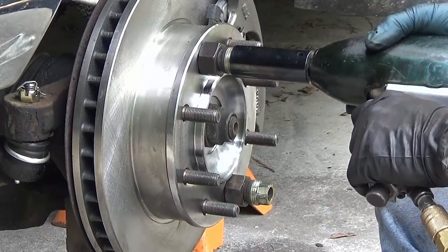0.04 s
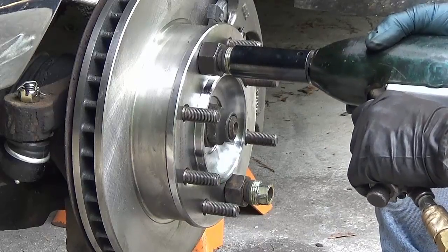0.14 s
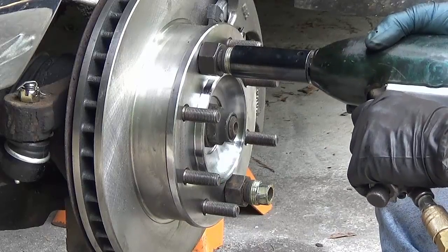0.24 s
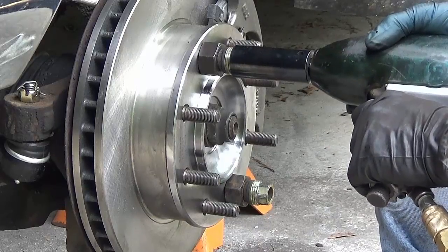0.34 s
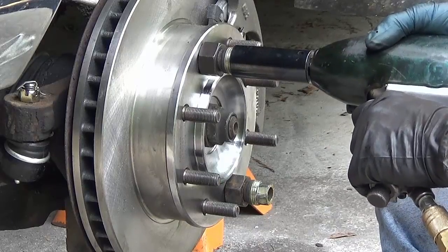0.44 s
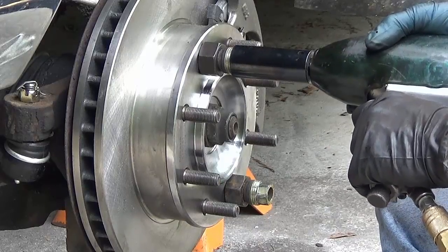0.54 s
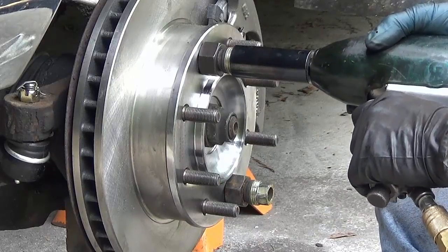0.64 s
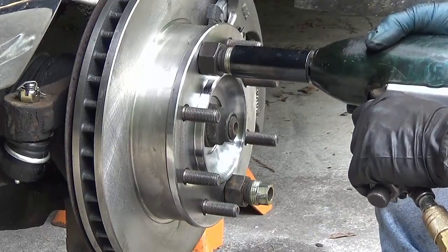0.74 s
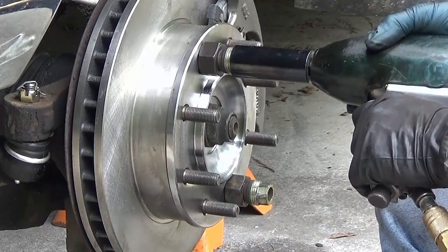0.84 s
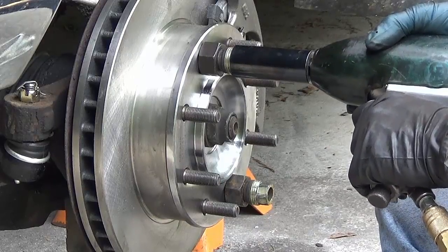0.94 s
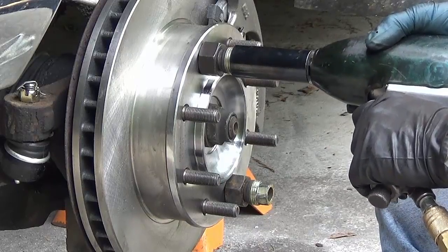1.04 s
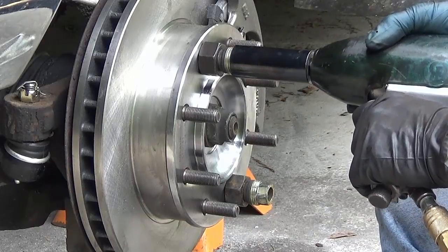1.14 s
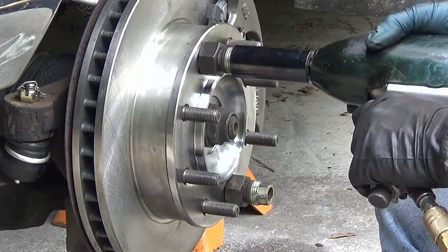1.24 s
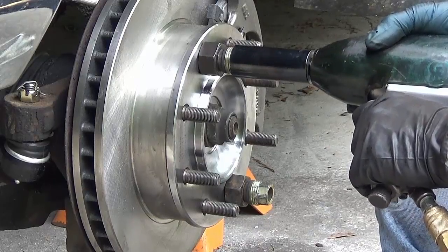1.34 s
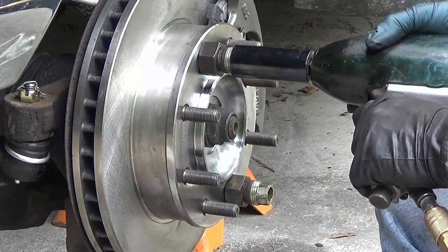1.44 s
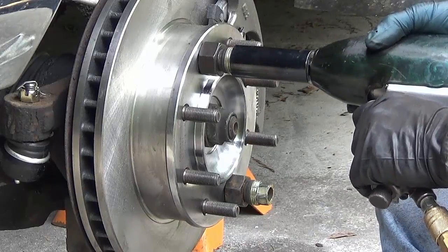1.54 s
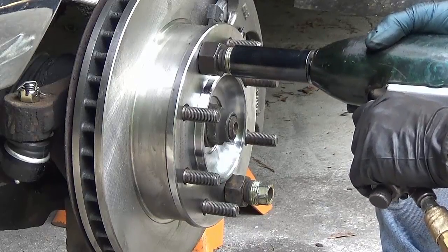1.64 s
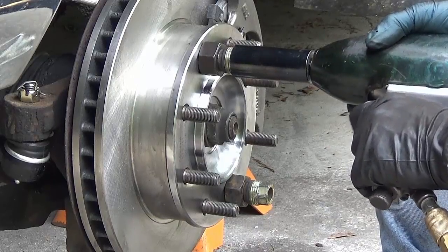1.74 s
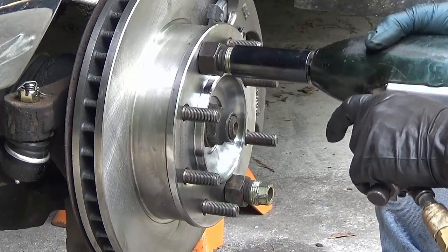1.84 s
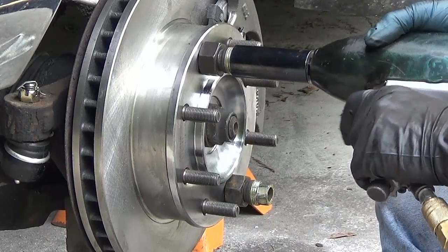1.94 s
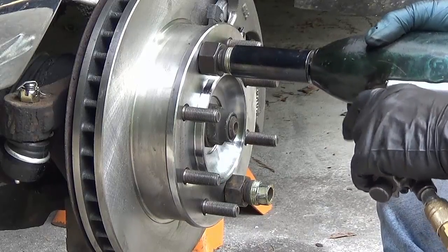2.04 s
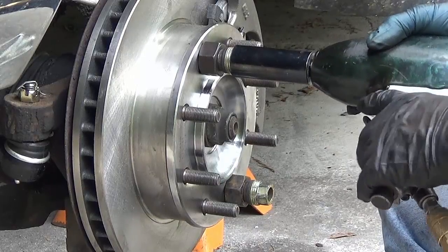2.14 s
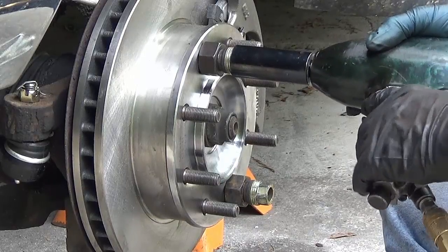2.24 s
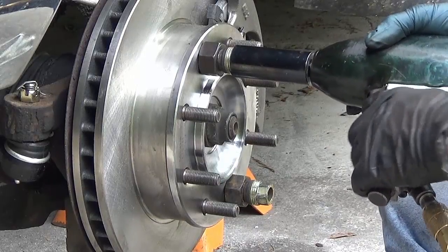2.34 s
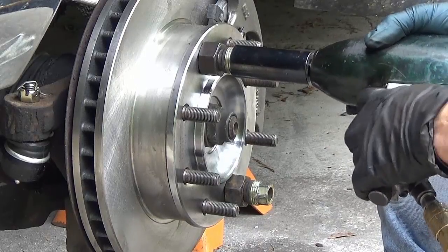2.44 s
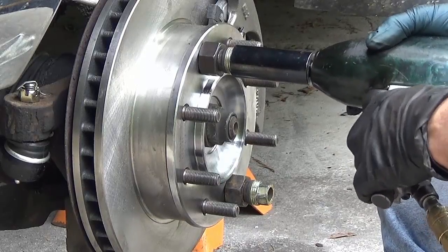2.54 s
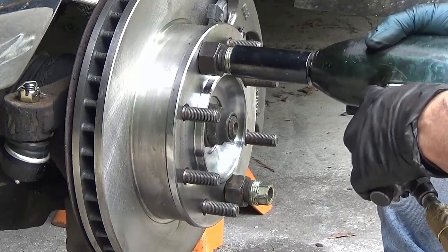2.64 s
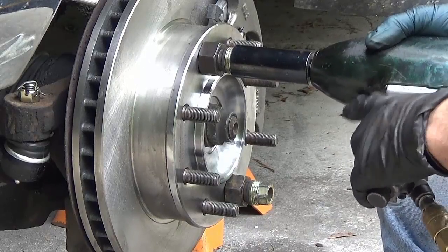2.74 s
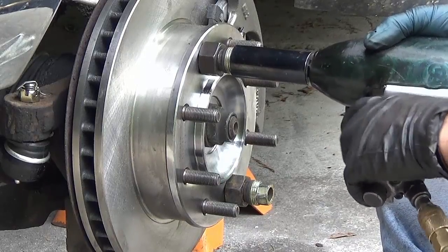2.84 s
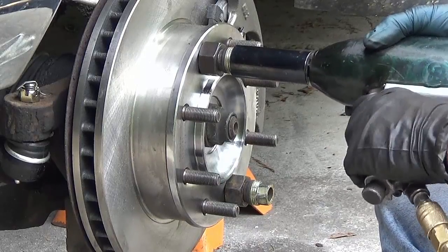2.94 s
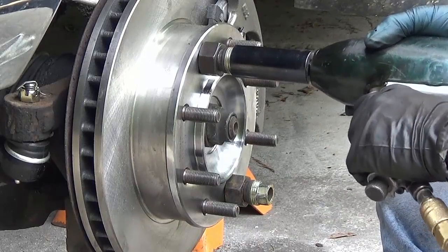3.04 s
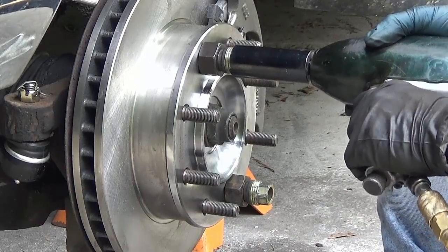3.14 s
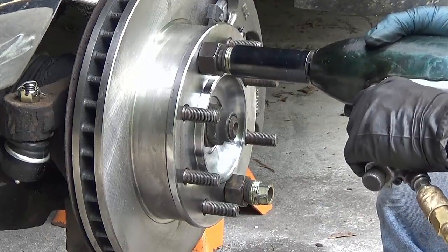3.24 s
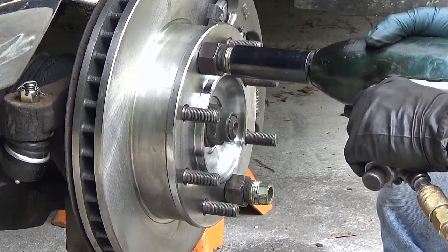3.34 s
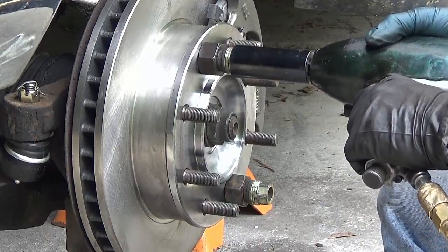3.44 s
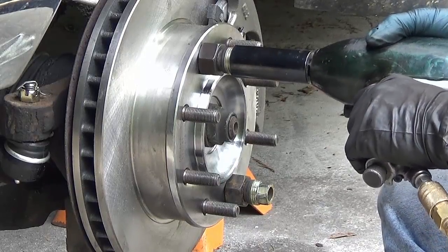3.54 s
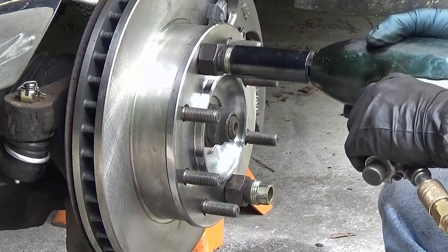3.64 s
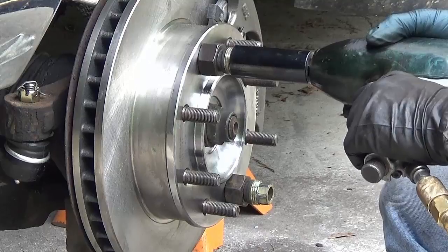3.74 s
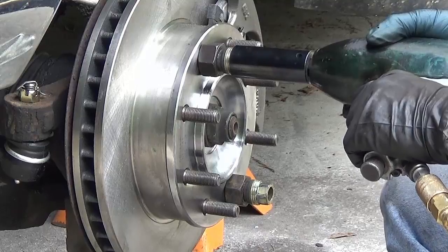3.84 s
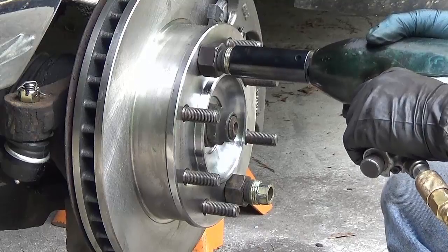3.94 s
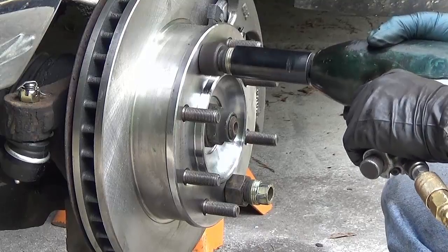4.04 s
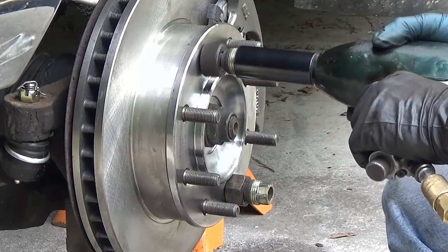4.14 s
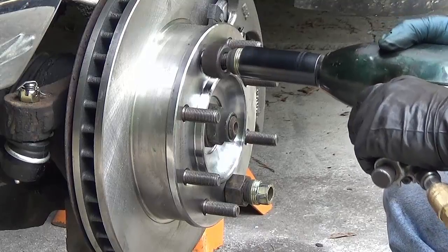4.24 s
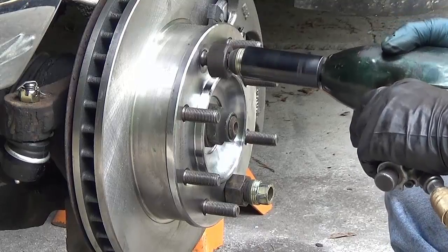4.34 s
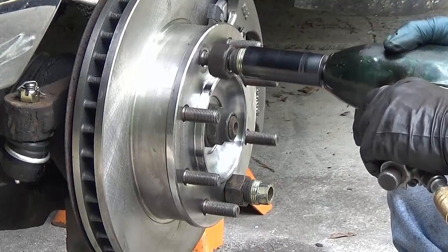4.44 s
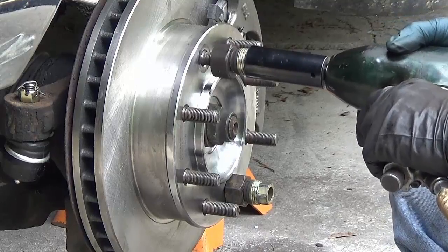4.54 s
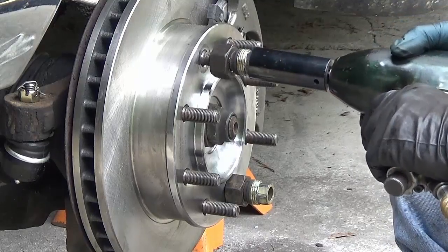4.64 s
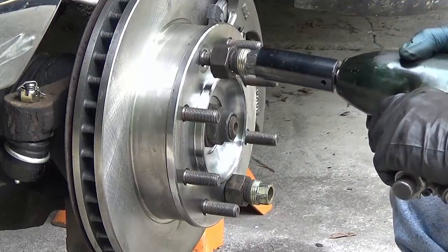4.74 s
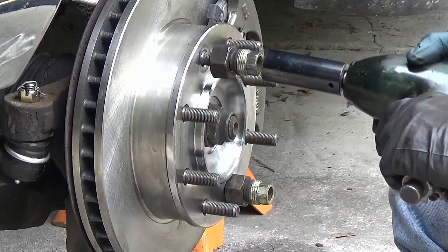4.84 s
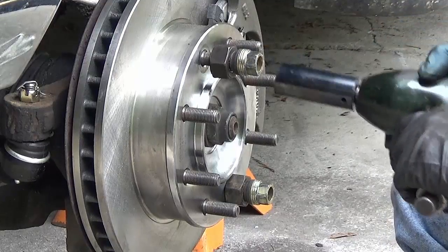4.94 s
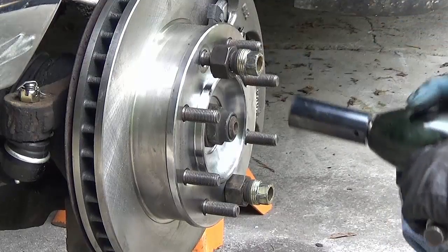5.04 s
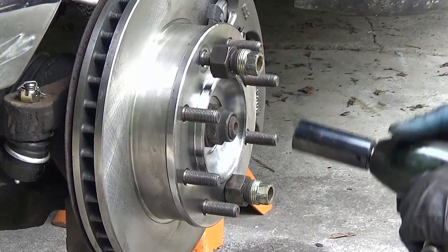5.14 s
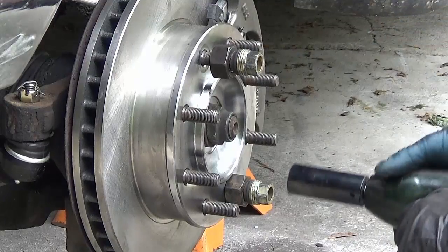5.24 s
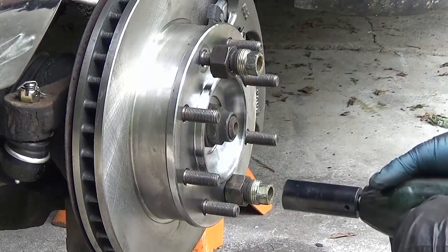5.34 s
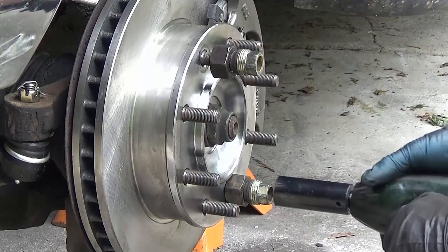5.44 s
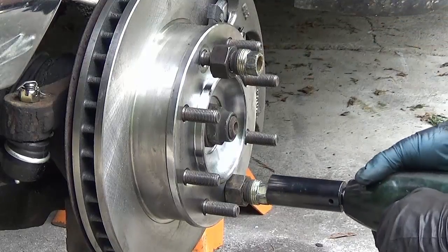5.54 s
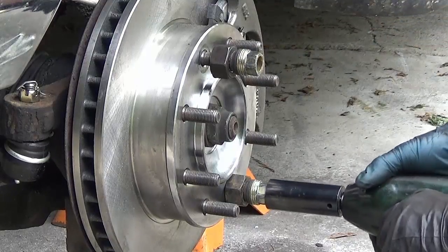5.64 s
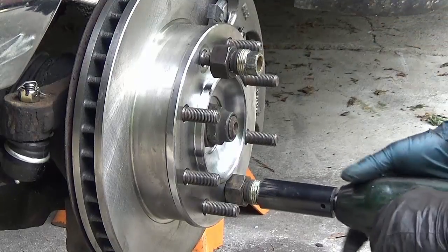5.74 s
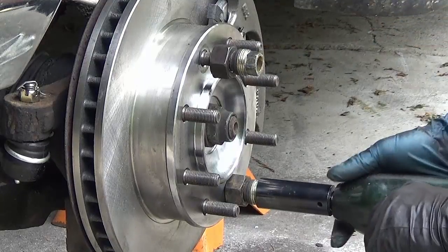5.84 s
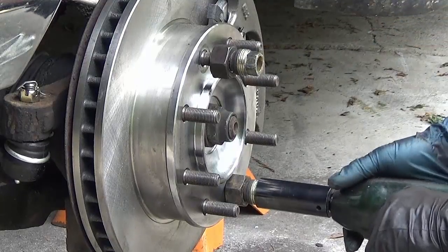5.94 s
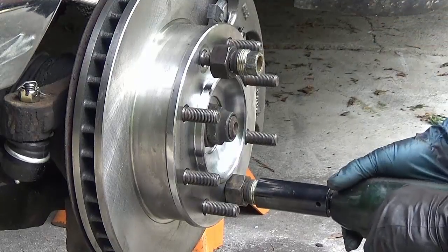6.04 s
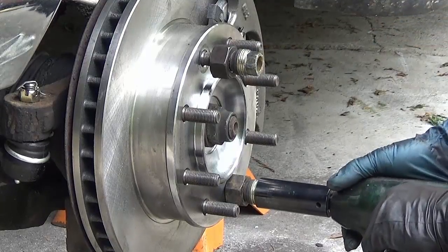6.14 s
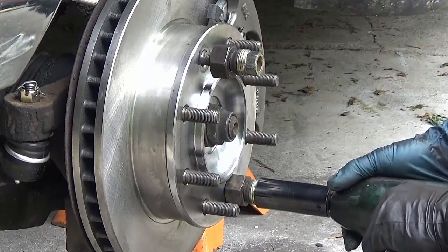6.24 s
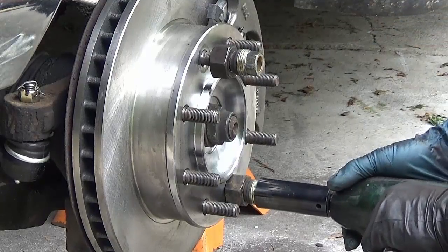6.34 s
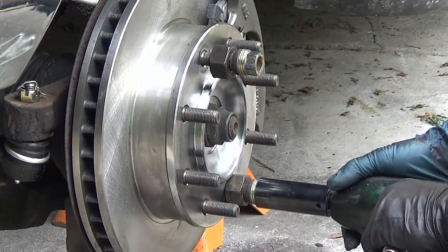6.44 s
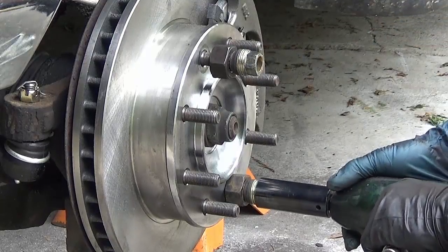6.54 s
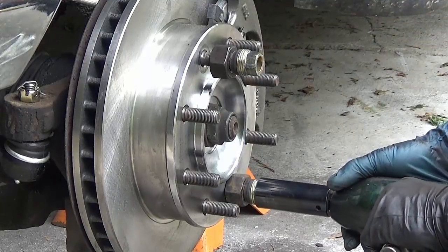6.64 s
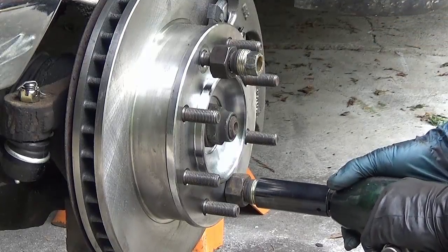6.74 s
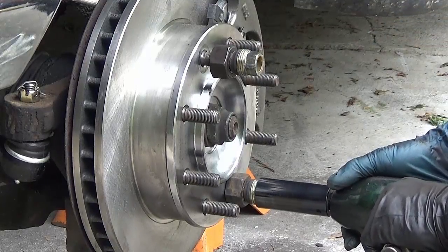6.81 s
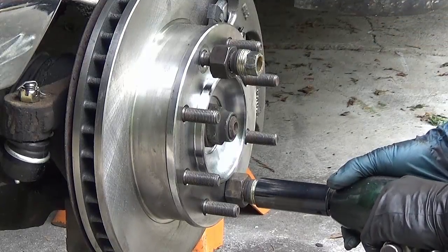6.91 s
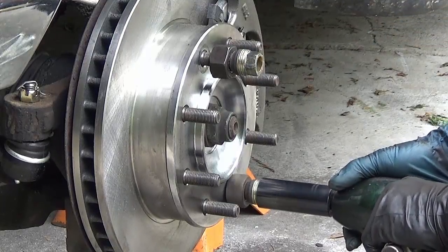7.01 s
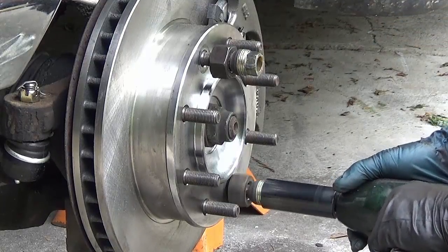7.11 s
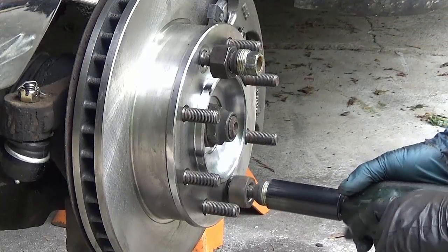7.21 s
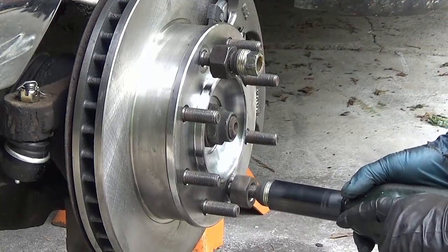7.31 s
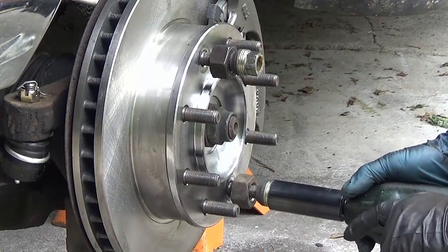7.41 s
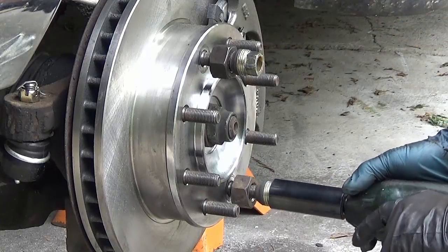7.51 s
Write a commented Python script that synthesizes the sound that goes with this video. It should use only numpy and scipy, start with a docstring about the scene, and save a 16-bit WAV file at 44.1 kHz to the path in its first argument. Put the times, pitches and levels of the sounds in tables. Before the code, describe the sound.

Three bursts of rapid metallic hammering from an air-powered wrench, close and centred in a garage. Each blow cracks and rings steel, with lighter rebounds between, over rough puffing and a broad air hiss. The first burst simply dies away; the next two quicken into a short whine and ticking run-down. Socket clinks and faint glove rustle fill the second gap. Short echoes spread to the sides over a quiet low rumble.

```python
"""An air impact wrench is already hammering, close by in a garage; two more bursts on wheel nuts follow.
Vane puffs and hissing exhaust air carry the motor, which stalls at each blow and whines when the load lets go.
Blows are noise cracks with ringing steel; lighter rebounds, coasting ticks and socket clinks fall between them.
The stereo microphone image has the tool in the middle, echoes at the sides and a low rumble behind.
A limiter ducks the loud moments."""
import sys
import numpy as np
from scipy import signal
from scipy.io import wavfile
from scipy.ndimage import uniform_filter1d, minimum_filter1d

SR = 44100
rng = np.random.default_rng(int(sys.argv[2]) if len(sys.argv) > 2 else 0)


def int16_out(signal):
    """Quantize to a 16-bit WAV file."""
    q = np.round(np.clip(np.atleast_2d(signal).T, -1, 1) * 32767)
    wavfile.write(sys.argv[1], SR, q.astype(np.int16))


N = 333837
T = np.arange(N) / SR


def amp(db):
    """Decibels to gain."""
    return 10 ** (np.asarray(db) / 20)


def unit(x):
    """Scales to rms 1."""
    return x / np.sqrt(np.mean(x ** 2) + 1e-20)


def read(points, hz):
    """A spectrum's value at hz, interpolated on a log frequency axis."""
    f, value = np.transpose(points)
    return np.interp(np.log(hz + 1), np.log(f), value)


def curve(points):
    """A level curve in dB as gain at every sample."""
    return amp(np.interp(T, *np.transpose(points)))


def add(mix, s, sound):
    """Mixes a sound in at time s."""
    part = mix[max(round(s * SR), 0):][:len(sound)]
    part += sound[:len(part)]


def through(x, response):
    """Passes x through an impulse response of energy 1."""
    return signal.oaconvolve(x, response / np.linalg.norm(response))[:N]


def colour(x, spectrum, size=4096):
    """Causal minimum-phase filter with the shape of the given spectrum."""
    log_gain = np.log(amp(read(spectrum, abs(np.fft.fftfreq(size, 1 / SR)))))
    minimum_phase = np.exp(np.conj(signal.hilbert(log_gain)))
    return through(x, np.fft.ifft(minimum_phase).real[:size // 2])


def modes_of(modes, detune=0, size=6000):
    """Impulse response of damped modes; detune shifts each a little by chance."""
    t = T[:size]
    hz, width, db = np.transpose(modes)[:, :, None]
    hz = hz * (1 + detune * rng.standard_normal(hz.shape))
    sign = (-1) ** np.arange(len(hz))[:, None]
    decay = np.exp(-np.pi * width * t)
    response = (sign * amp(db) * np.sqrt(width) * decay * np.sin(2 * np.pi * hz * t)).sum(0)
    return response / np.linalg.norm(response)


def ring(x, modes):
    """Rings a fixed set of modes."""
    return through(x, modes_of(modes))


def wobble(per_s):
    """Smooth chance of rms 1, with per_s new values a second."""
    knots = rng.standard_normal(N // 16)
    return unit(np.interp(T * per_s, np.arange(len(knots)), knots))


# Low rumble of the garage. Each row: frequency in Hz, relative density in dB.
GARAGE_RUMBLE = [(12, -56.5), (20, -28), (86, -4), (172, -8.5), (293, -12.5), (446, -17), (574, -15),
                 (1260, -18.5), (1440, -21), (1570, -17.5), (1910, -22), (3160, -24), (3630, -26),
                 (16000, -70)]
GARAGE_DB = -52.5


def garage():
    """The garage's low rumble, as steady coloured noise."""
    return amp(GARAGE_DB) * colour(rng.standard_normal(N), GARAGE_RUMBLE)


# Air seeping at the valve. Each row: time in seconds, level in dB.
LEAK_LEVEL = [(0, -60), (1.9, -53.5), (2.15, -56.5), (2.4, -53), (2.9, -51.5), (4.3, -53), (4.6, -75),
              (4.9, -67), (5.03, -63), (5.2, -67), (7.57, -53)]
# Spectrum of the seeping air. Each row: frequency in Hz, relative density in dB.
LEAK_SPECTRUM = [(1500, -25.5), (3500, -14.5), (4500, -7.5), (5000, -9.5), (5500, -3.5), (6300, -7.5),
                 (7200, -12), (8600, -15), (9800, -10.5), (12000, -17), (16000, -29.5)]


def leak():
    """Air seeping at the valve makes a thin, faint hiss of turbulence."""
    return curve(LEAK_LEVEL) * colour(rng.standard_normal(N), LEAK_SPECTRUM)


# The tool is carried to the next nut: middle of the move (s), length scale of its swell (s), level (dB)
MOVE_S, MOVE_HALF_S, MOVE_DB = 5.49, 0.36, -52.5
# Spectrum of gloves and hose. Each row: frequency in Hz, relative density in dB.
RUSTLE_SPECTRUM = [(50, -12), (95, 10), (200, -5), (400, -5), (1000, -8), (1600, -9), (3200, -27),
                   (7000, -39)]


def handling(patchy_db=1.0):
    """Gloves and air hose rustle faintly as the tool is carried to the next nut."""
    swell = np.exp(-((T - MOVE_S) / MOVE_HALF_S) ** 2) * amp(MOVE_DB + patchy_db * wobble(25))
    return colour(swell * rng.standard_normal(N), RUSTLE_SPECTRUM)


# Hammer speed, one curve a burst, starting at its first blow.
# Each row: time in seconds, blows per second.
HAMMER_RATES = [
    [(0.0054, 13.43), (0.4, 13.76), (0.55, 13.12), (1.2, 13.02), (1.67, 13.2), (1.75, 12.15)],
    [(2.9931, 14.21), (3.1, 13.28), (3.45, 13.67), (3.91, 15.65), (3.98, 20.4), (4.18, 18.55),
     (4.25, 14.39)],
    [(5.9496, 13.92), (6.17, 13.3), (6.5, 14.79), (6.8, 14.87), (6.93, 18.42), (7.09, 17.82), (7.16, 11.82)],
]
# How the nut takes the blows, one curve a burst. Each row: time in seconds, blow strength in relative dB,
# socket ring in dB relative to the blow, rebound strength in relative dB, mean rebound delay in seconds.
NUT_GRIP = [
    [(0, -5.5, -6.5, -4, 0.033), (.8, -4, -9.5, -5, 0.04), (1.2, -8, -6.5, -6.5, 0.03),
     (1.5, -6.5, -9.5, -15.5, 0.033), (1.82, -10, -5.5, -34, 0.038)],
    [(3, -1.5, -9.5, -3.5, 0.042), (3.4, -1.5, -10, -2, 0.041), (3.75, -2.5, -8, -5, 0.025),
     (4.05, -1, -27, -19, .026), (4.24, -2, -27, -21, 0.02)],
    [(5.95, -2, -10, -6.5, 0.032), (6.25, -1.5, -10, 0.5, 0.044), (6.65, -0.5, -20, -4, 0.032),
     (6.9, -2, -32, -7, 0.042), (7.22, -2, -37, -22, 0.022)],
]


def blows():
    """One blow for each turn of the hammer: time, strength, socket ring, rebound strength, rebound delay."""
    bursts = []
    for rate, grip in zip(HAMMER_RATES, NUT_GRIP):
        times = [rate[0][0]]
        while times[-1] < rate[-1][0]:
            blows_per_s = np.interp(times[-1], *np.transpose(rate))
            times.append(times[-1] + 1 / blows_per_s)
        s, *columns = np.transpose(grip)
        bursts.append([times] + [np.interp(times, s, c) for c in columns])
    return np.hstack(bursts)


def stalled(wind_up_s=.07):
    """How strongly a blow holds the rotor: near 1 at the blow, falling to 0 as it winds up again."""
    times = np.append(-1, blows()[0])
    since = T - times[np.searchsorted(times, T) - 1]
    return uniform_filter1d(np.clip(1 - since / wind_up_s, 0, 1), size=130)


OPEN_S, SHUT_S = 0.061, 0.035  # travel time of the trigger valve
LET_GO_S = .025  # how quickly the load lets go of the motor


def trigger(pressed, lets_go, released):
    """One pull at every sample: valve opening 0-1, motor load 0-1, seconds held, seconds since release."""
    opening = np.clip((T - pressed) / OPEN_S, 0, 1) ** 2
    load = .5 - .5 * np.tanh((T - lets_go) / (2 * LET_GO_S))
    held_s = np.clip(T, pressed, released) - pressed
    coast_s = np.maximum(T - released, 0)
    return opening, load, held_s, coast_s


# Pulls of the trigger. Each row: pressed in seconds, load lets go in seconds, released in seconds,
# relative exhaust level in dB, exhaust sag in dB/s, relative motor level in dB, motor sag in dB/s,
# coasting fade of the motor in dB/s.
TRIGGER_PULLS = [(-0.05, 1.95, 1.79, -19.5, 4.5, -24.5, 3.5, 180),
                 (2.935, 4.03, 4.204, -17.5, 4, -23.5, 1, 126), (5.9, 6.95, 7.17, -15, 5.5, -20, 2.5, 108)]
# Spectrum of the exhaust hiss. Each row: frequency in Hz, relative density in dB.
EXHAUST_SPECTRUM = [(530, -21), (900, -14.5), (1100, -6), (1700, 1.5), (2120, -1.5), (2540, 2.5), (3260, 1),
                    (4010, 2.5), (4920, 0.5), (9650, -5), (11800, -10), (15100, -15), (16000, -22)]


def exhaust(flutter_db=2, stall_db=-3, free_db=3, shut_db=-12, fade_share=0.67):
    """Turbulent spent air sags as the hose drains, dips at each blow and fades once the valve shuts."""
    air = np.zeros(N)
    for pressed, lets_go, released, air_db, sag_db_per_s, _, _, fade_db_per_s in TRIGGER_PULLS:
        opening, load, held_s, coast_s = trigger(pressed, lets_go, released)
        closing_db = shut_db * np.minimum(coast_s / SHUT_S, 1) - fade_share * fade_db_per_s * coast_s
        air += opening * amp(air_db - sag_db_per_s * held_s + free_db * (2 - load) + closing_db)
    flutter = amp(flutter_db * wobble(500) + stall_db * stalled())
    return colour(rng.standard_normal(N) * air * flutter, EXHAUST_SPECTRUM)


# Whine of the free motor. Each row: harmonic frequency in Hz, relative level in dB.
WHINE_SPECTRUM = [(80, -29.5), (160, -17), (240, 1.5), (310, 3), (390, -4), (480, -1), (590, -3), (800, -6),
                  (1050, -12), (1350, -2.5), (1600, -4.5), (1950, -11.5), (2400, -17), (4000, -18)]
# share of its speed that the free-running rotor loses at a blow
FREE_SAG = .1


def motor(pull, pitch, jitter=.009, rough=0.68, free_rough=0.27, puff_turns=0.48,
          stall_db=-11, bright_db=12, choke_db=-5, free_db=3, harmonics=13):
    """Loaded vanes let out ragged puffs that speed up after each blow; running free they whine."""
    pressed, lets_go, released, _, _, motor_db, sag_db_per_s, fade_db_per_s = pull
    on = (T >= pressed) & (T <= released + .5)
    opening, load, held_s, coast_s = (c[on] for c in trigger(pressed, lets_go, released))
    fall_db = sag_db_per_s * held_s + fade_db_per_s * coast_s
    level = opening * amp(motor_db - fall_db + free_db * (1 - load))

    hz = np.interp(T[on], *np.transpose(pitch))
    struck = stalled()[on]
    stall = load * struck
    free_slowing = 1 - FREE_SAG * (1 - load) * struck
    speed = hz * (1 - stall) * free_slowing * (1 + jitter * wobble(200)[on])
    turns = np.cumsum(speed) / SR  # in vane periods
    at_blow = np.maximum.accumulate(turns * (np.diff(struck, prepend=0) > 0))
    vanes = turns - at_blow  # the hammer always lands at the same rotor angle

    pulses = (np.diff(np.floor(vanes), prepend=0) > 0) * np.sqrt(SR / hz)
    puffs = unit(np.exp(-(vanes % 1) / puff_turns) * rng.standard_normal(N)[on])
    tilt_db = bright_db * np.log2(hz / 280)  # a faster rotor chops the air more sharply
    tone = 0
    for k in range(1, harmonics + 1):
        gain = amp(read(WHINE_SPECTRUM, k * hz) + tilt_db * np.log10(k))
        tone = tone + gain * np.cos(2 * np.pi * (k * turns + rng.random()))

    flow, whine = np.zeros((2, N))
    flow[on] = level * amp(stall_db * stall) * (load * (pulses + rough * puffs) + free_rough * puffs)
    whine[on] = level * amp(choke_db * struck) * (1 - load) * tone  # each blow chokes the whine briefly
    return flow - uniform_filter1d(flow, size=700), whine  # the flow without its slow drift


# Motor speed before blows slow it, one curve a burst. Each row: time in seconds, vane pitch in Hz.
MOTOR_PITCH = [
    [(0, 190), (1.75, 190), (1.97, 70)],
    [(2.95, 170), (4.02, 192), (4.125, 297), (4.18, 334), (4.228, 349), (4.25, 265), (4.3, 217),
     (4.42, 142), (4.56, 80)],
    [(5.93, 160), (6.96, 195), (7.08, 342), (7.14, 386), (7.16, 350), (7.22, 283), (7.235, 228),
     (7.35, 138), (7.57, 65)],
]
# Muffler response. Each row: frequency in Hz, relative gain in dB.
MUFFLER_RESPONSE = [(25, 5), (60, -9), (120, -10.5), (180, -1), (270, 4.5), (330, -15), (600, -2),
                    (800, -4.5), (1100, -29.5), (1500, -5), (2200, -29), (4000, -18.5)]
# Exhaust port resonances. Each row: frequency in Hz, width in Hz, relative level in dB.
PORT_MODES = [(245, 100, -3), (388, 30, 2), (565, 70, -5)]


def air_motor():
    """The vane puffs leave through the muffler and the resonant exhaust port, which also colours the whine."""
    parts = [motor(pull, pitch) for pull, pitch in zip(TRIGGER_PULLS, MOTOR_PITCH)]
    flow, whine = np.sum(parts, axis=0)
    puffs = colour(flow, MUFFLER_RESPONSE) + amp(-1.5) * ring(flow, PORT_MODES)
    return amp(-.5) * puffs + amp(3.0) * whine + amp(-23) * ring(whine, PORT_MODES)


def contacts(times, levels_db, attack_s, decay_s, chatter_db, chatter_s, grain, modes=None, size=5000):
    """Each strike is a hard contact followed by a dying chatter of loose steel parts."""
    force, t = np.zeros(N), T[:size]
    fall = np.exp(-t / decay_s) + amp(chatter_db) * np.exp(-t / chatter_s)
    envelope = (1 - np.exp(-t / attack_s)) * fall
    for s, db in zip(times, levels_db):
        grit, lumps = rng.standard_normal((2, size))
        lumpiness = unit(np.exp(grain * unit(uniform_filter1d(lumps, size=60))))
        strike = envelope * grit * lumpiness
        if modes:  # the socket seats differently at every strike, which shifts its ring
            strike = signal.fftconvolve(strike, modes_of(modes, detune=0.029, size=3000))
        add(force, s, amp(db) * strike)
    return force


# Knocks of the socket against a nut, and one light rebound of the hammer at 2.96 s. Each row: time in seconds,
# # relative strength in dB, socket ring in dB relative to the crack before mixing.
SOCKET_CLINKS = [(2.5355, -23, -22), (2.9425, -6.5, -10), (2.9643, -15, -23), (4.7797, -33, -4),
                 (5.1726, -46, -14), (5.4934, -9, -4.5), (5.497, -15.5, -14), (5.6406, -13.5, -10),
                 (5.7625, 4.5, -16)]
# The coasting hammer ticking against the anvil. Each row: time in seconds, relative strength in dB,
# high ping in dB relative to the crack before mixing.
COASTING_TICKS = [(4.2273, -20, -28), (4.2396, -13, -17), (4.282, -11, -38), (4.2964, -20, -36),
                  (4.304, 1.5, -24), (4.3922, -17.5, -27), (4.4408, -25, -28), (4.4547, -29, -30),
                  (4.4946, -30, -28.5), (4.558, -41, -33), (4.638, -40.5, -29), (7.2095, -24, -28),
                  (7.3162, -15, -29), (7.3424, -15.5, -26.5), (7.386, -14, -31), (7.4413, -20, -29),
                  (7.485, -27.5, -25.5), (7.5293, -27.5, -36)]
# relative to the crack before mixing: high ping of a clink, socket ring of a tick
CLINK_PING_DB, TICK_RING_DB = -37, -14.5
# Spectrum of a clink's crack. Each row: frequency in Hz, relative density in dB.
CLINK_SPECTRUM = [(120, -33.5), (200, -6), (1180, 0.5), (1870, -6), (2470, -8), (3070, 4), (4200, -10),
                  (4600, -3), (7830, 0.5), (8420, -10.5), (16000, -20)]
# Steel, socket, small-part and hub resonances. Each row: frequency in Hz, width in Hz, relative level in dB.
STEEL_MODES = [(2125, 90, -6), (2545, 60, 0), (2852, 60, -1), (3515, 110, -3), (3900, 140, -3),
               (4175, 55, -1), (4255, 80, -3), (4610, 70, -3), (4860, 90, -3), (5185, 70, -4),
               (5775, 150, -1), (6330, 90, -4), (6535, 70, -5)]
SOCKET_MODES = [(2330, 170, -5), (2480, 110, -1), (2560, 110, 0), (2700, 170, -3), (2855, 140, -5),
                (3700, 350, -7), (4200, 280, -6)]
PING_MODES = [(5830, 200, 5), (9700, 400, 0), (13550, 140, 0)]
HUB_MODES = [(411, 6.1, 5.5), (402, 62, -7), (503, 26, 5), (1197, 15, 3)]


def clinks():
    """Loose socket and coasting hammer tap steel and chatter; small parts ping, the hub rings low."""
    rows = [(*row, CLINK_PING_DB) for row in SOCKET_CLINKS]
    rows += [(s, db, TICK_RING_DB, ping_db) for s, db, ping_db in COASTING_TICKS]
    s, db, ring_db, ping_db = np.transpose(rows)
    lumpy = .2
    force = contacts(s, db, attack_s=0.0024, decay_s=0.0036, chatter_db=-22, chatter_s=0.014, grain=lumpy)
    socket = contacts(s, db + ring_db, attack_s=0.0013, decay_s=0.0044, chatter_db=-38.0,
                      chatter_s=0.014, grain=lumpy, modes=SOCKET_MODES)
    ping = contacts(s, db + ping_db, attack_s=0.00066, decay_s=0.0047, chatter_db=-26,
                    chatter_s=0.0063, grain=lumpy)
    body = amp(-7.5) * colour(force, CLINK_SPECTRUM)
    body += amp(-36.0) * ring(force, STEEL_MODES) + amp(-18.5) * ring(force, HUB_MODES)
    return body + amp(5.0) * socket + amp(22) * ring(ping, PING_MODES)


# chance variation in a blow's strength and in its rebound's delay
UNEVEN_DB, UNEVEN_S = 0.5, .0012
# the hammer cams over just before each blow; level relative to the blow before mixing
CAM_LEAD_S, CAM_DB = .009, -9.5
# Spectrum of the light knocks. Each row: frequency in Hz, relative density in dB.
KNOCK_SPECTRUM = [(590, -30.5), (1000, 1.5), (2470, -2), (3460, 13), (4020, 10.5), (6780, 9), (9600, 14.5),
                  (15100, -3.5), (16000, -30.5)]


def rebounds():
    """Lighter, brighter knocks: the hammer rebounds after each blow and cams over just before the next."""
    s, db, _, rebound_db, delay_s = blows()
    delay_s = delay_s + UNEVEN_S * rng.standard_normal(len(s))
    times = np.append(s + delay_s, s[1:] - CAM_LEAD_S)
    levels_db = np.append(rebound_db, db[1:] + CAM_DB)
    force = contacts(times, levels_db, attack_s=0.0027, decay_s=0.0027, chatter_db=-5.5,
                     chatter_s=0.006, grain=0.41)
    return amp(3.5) * colour(force, KNOCK_SPECTRUM) + amp(-10.0) * ring(force, STEEL_MODES)


# Spectrum of a main blow's crack. Each row: frequency in Hz, relative density in dB.
CRACK_SPECTRUM = [(530, -52), (900, -7), (2070, -9.5), (2450, -7), (3260, -8), (4150, -3.5), (7140, -3.5),
                  (9770, -5.5), (12000, -13), (13800, -13), (16000, -55)]


def hammer():
    """Main blows crack through the anvil, ring the socket, and set the brake disc clattering."""
    s, db, ring_db, _, _ = blows()
    db = db + UNEVEN_DB * rng.standard_normal(len(s))
    rise_s = .0015
    crack = contacts(s, db, attack_s=rise_s, decay_s=0.013, chatter_db=-11.0, chatter_s=0.0063, grain=0.061)
    clatter = contacts(s, db, attack_s=rise_s, decay_s=0.0067, chatter_db=-19.0, chatter_s=0.012, grain=0.087)
    socket = contacts(s, db + ring_db, attack_s=rise_s, decay_s=0.017, chatter_db=-15,
                      chatter_s=0.02, grain=0.38, modes=SOCKET_MODES)
    struck_steel = amp(-2.0) * colour(crack, CRACK_SPECTRUM) + amp(-3.5) * ring(clatter, STEEL_MODES)
    return struck_steel + amp(0.5) * socket


# Decay of the garage's echo. Each row: frequency in Hz, time to fall by 60 dB in seconds.
ROOM_DECAY = [(150, 0.36), (500, 0.54), (2500, 0.21), (6000, 0.11), (15000, 0.08)]


def room(x, near_db, tail_db, size=20000):
    """Echoes off disc and floor, then a short tail whose treble dies first above the low mids."""
    near = np.zeros(size)
    near[rng.integers(40, 700, size=12)] = rng.choice([-1., 1.], size=12)
    late_noise = rng.standard_normal(size) * (T[:size] > .006)
    hz, t, z = signal.stft(late_noise, SR, nperseg=256)
    fading = amp(-60 * t / read(ROOM_DECAY, hz)[:, None])
    tail = signal.istft(z * fading, SR, nperseg=256)[1]
    return amp(near_db) * through(x, near) + amp(tail_db) * through(x, tail)


def scene():
    """The tool in the middle, its echoes a little to the sides, over the garage's low rumble."""
    tool = leak() + handling() + exhaust() + air_motor() + clinks() + rebounds() + hammer()
    mid = tool + room(tool, near_db=-11.5, tail_db=-15.0) + garage()
    # side spectrum: (Hz, relative dB)
    spread = [(100, 1.0), (300, 1), (600, 8), (2500, 8.5), (5000, 3), (9000, 5.0), (13000, -34)]
    side_echoes = colour(room(tool, near_db=-6.0, tail_db=-15.0), spread)
    side = amp(-14) * side_echoes + amp(-14.5) * garage()
    return np.array([mid + side, mid - side])


EDGE_HZ = 16050  # upper band limit


def record(dry, threshold_db=-15, release_db_per_s=260):
    """A limiter that looks slightly ahead and recovers quickly; then the band limit."""
    power = abs(uniform_filter1d((dry ** 2).mean(0), size=90))
    power_db = 10 * np.log10(power + 1e-12)
    over_db = -minimum_filter1d(-np.maximum(power_db - threshold_db, 0), size=150)
    fall = T * release_db_per_s
    held_db = np.maximum.accumulate(over_db + fall) - fall
    limited = dry * amp(-uniform_filter1d(held_db, size=40))
    low_pass = signal.firwin(511, EDGE_HZ, window=("kaiser", 9), fs=SR)
    return signal.oaconvolve(limited, low_pass[None], "same")


dry = scene()
out = record(dry)
int16_out(out)
```